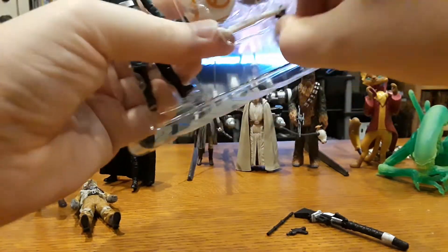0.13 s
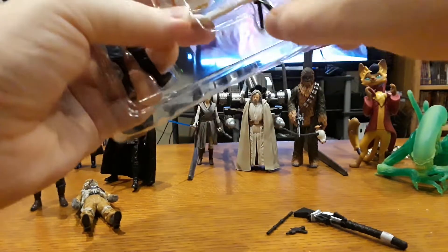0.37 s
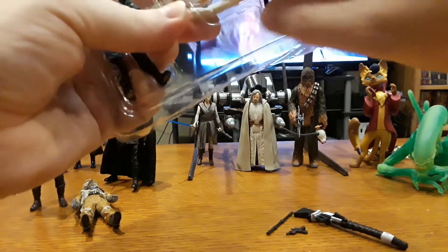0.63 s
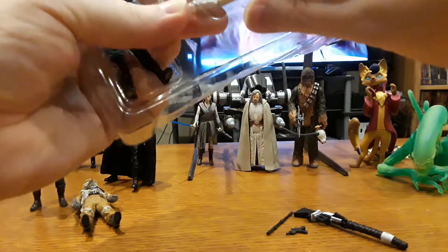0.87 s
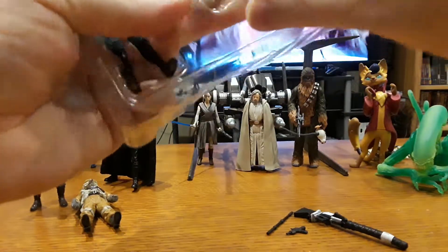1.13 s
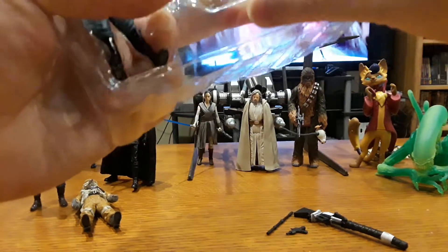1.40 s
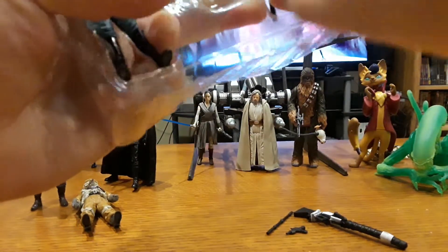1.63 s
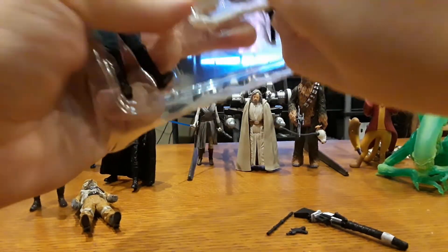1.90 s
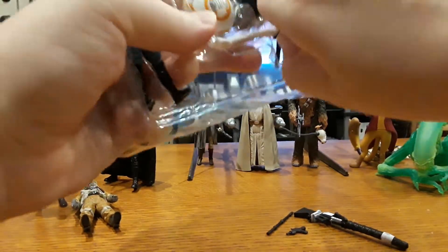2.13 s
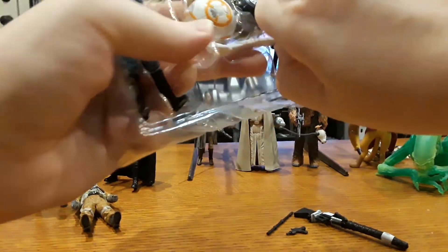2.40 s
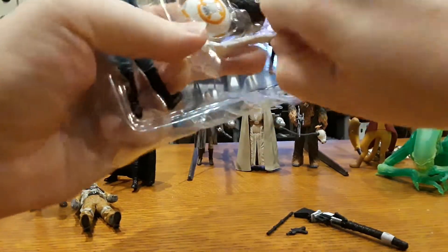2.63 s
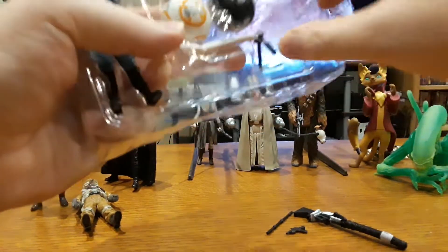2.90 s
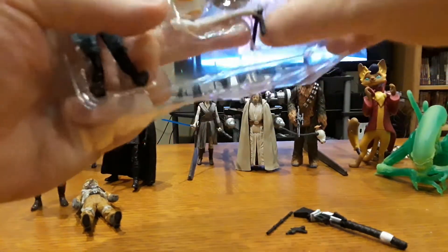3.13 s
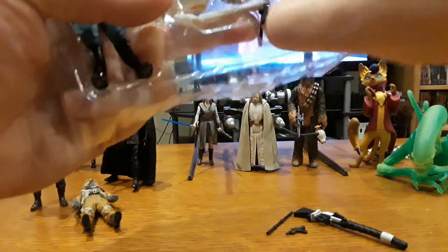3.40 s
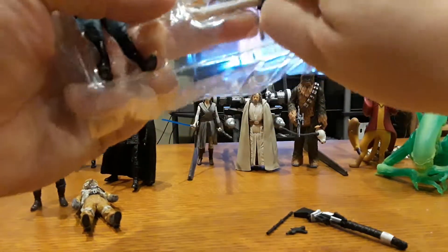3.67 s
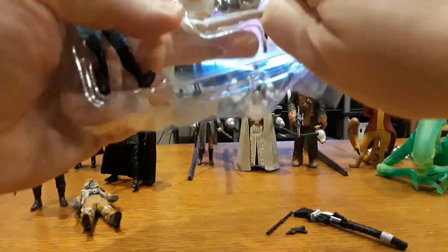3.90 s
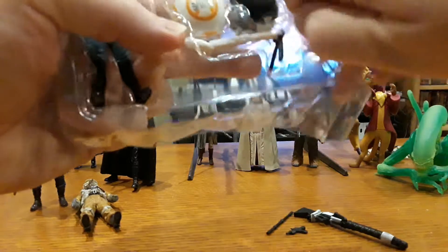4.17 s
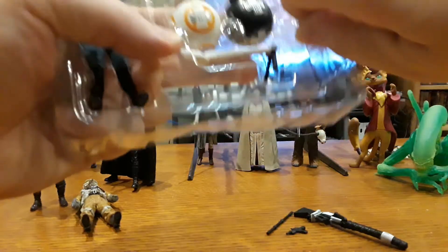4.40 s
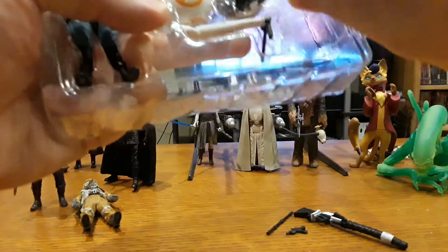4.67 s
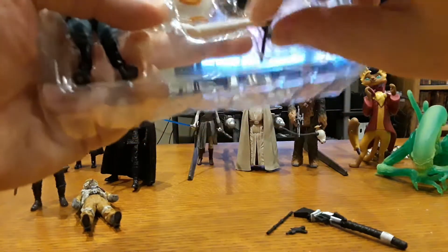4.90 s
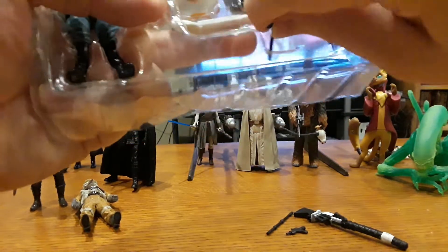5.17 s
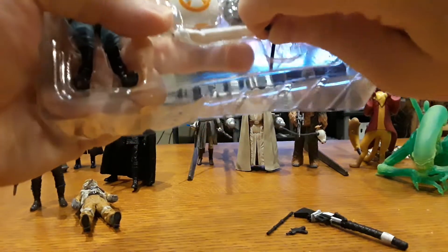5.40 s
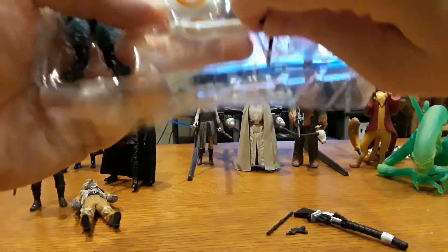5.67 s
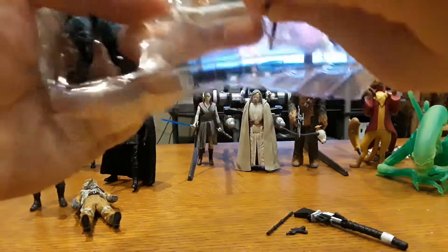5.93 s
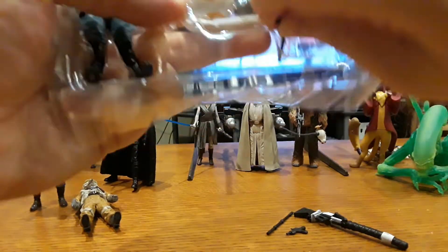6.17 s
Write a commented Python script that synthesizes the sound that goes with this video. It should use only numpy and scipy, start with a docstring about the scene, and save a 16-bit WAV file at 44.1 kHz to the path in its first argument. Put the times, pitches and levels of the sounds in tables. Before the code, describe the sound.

A stiff clear plastic tray is twisted by hand close to a stereo microphone in a small room, over faint hiss and low handling rumble. From 0 to 1.8 seconds, dry midrange clicks come irregularly amid fine crackle, short ticking slides and dull hollow pops, brighter around 1.1 and strong at 1.24. A hard snap with a puff of air, mostly left, lands at 1.9. From 2 to 3.7 it is lighter: small ticks, ratcheting runs and soft finger rub around 2.8 and 3.1 to 3.6, with one piercing tick near 3.2. Slides quicken from 3.8 into heavy cracks at 3.98 and 4.06, the loudest snap, filling the room with a short bright tail. After a click at 4.24 it thins to near quiet by 4.5. Faint ticking resumes around 4.8, clicks thicken from 5.4, and big buckling pops hit at 5.8, 5.9 and 6.05, with crackle to the end at about 6.3.

```python
"""Twisting a stiff plastic tray

Hands twist a stiff clear plastic tray close to two microphones on a table in a small room.
Clicks, most of them buckling creases, are short noise bursts that ring the crease and the tray's hollows.
Edges slide in ticking runs; dull damped thumps lie under some clicks or are panels popping.
Filtered noise makes the rub of fingers and a low rumble of handling.
Two hard snaps puff air, mostly at the left microphone, and fill the room; a faint hiss lies below."""
import sys
import numpy as np
from scipy import signal
from scipy.fft import rfft, irfft
from scipy.io import wavfile
from scipy.ndimage import uniform_filter1d

SR = 44100
rng = np.random.default_rng(int(sys.argv[2]) if len(sys.argv) > 2 else 0)


def int16_out(signal):
    """Quantize to a 16-bit WAV file."""
    q = np.round(np.clip(np.atleast_2d(signal).T, -1, 1) * 32767)
    wavfile.write(sys.argv[1], SR, q.astype(np.int16))


def field_ratio(decibels):
    """Amplitude ratio for a level in dB (20 dB per decade); scalars and array-likes work."""
    return 10 ** (np.asarray(decibels, dtype=float) / 20)


N = 277609  # samples in the scene, about 6.3 s
LEN = 2048  # samples in one short sound
T = np.arange(LEN) / SR  # seconds
HZ = np.arange(LEN // 2 + 1) * SR / LEN + 1e-3  # just above zero, so we can divide by it


def ring(hz, width):
    """Complex response of a resonance, gain 1 at its centre; a narrow width (Hz) rings longer."""
    detune = (HZ / hz - hz / HZ) * hz / width
    return 1 / (1 + 1j * detune)


def peak(spectrum, db):
    """Turn spectra back into sound, each row scaled to its peak level."""
    x = irfft(spectrum, LEN)
    return x * field_ratio(db) / np.abs(x).max(axis=-1, keepdims=True)


# How far the left microphone hears the tray ahead of the right one, as the tray moves.
# Each row: time in seconds, lead in milliseconds.
LEAD = [(0, .19), (2.3, .23), (2.8, .09), (3.7, .25), (4.5, .06), (5.2, .26)]


def place(s, grains, pan_db, alike):
    """Lay two-version sounds on the timeline: the right side is later and only partly the same."""
    out = np.zeros((2, N + LEN))
    rights = alike * grains[0] + np.sqrt(1 - alike ** 2) * grains[1]
    lead_ms = np.interp(s, *np.transpose(LEAD))
    for t, lead, left, right, pan in zip(s, lead_ms, grains[0], rights, pan_db):
        i = max(int(t * SR), 0)
        j = i + int(lead * SR / 1000)
        out[0, i:i + LEN] += left * field_ratio(pan / 2)
        out[1, j:j + LEN - 16] += right[:-16] * field_ratio(-pan / 2)  # shortened to leave room for the lead
    return out[:, :N]


def bands(centres, size):
    """Unrelated stereo noise in third-octave bands; the bass is more alike left and right."""
    for hz in centres:
        mid, side = rng.standard_normal((2, size))
        sos = signal.butter(2, [hz / 1.14, hz * 1.14], "band", fs=SR, output="sos")
        share = min(hz / 1000, 1)
        stereo = mid + share * side * np.array([[1], [-1]])
        yield signal.sosfilt(sos, stereo) / np.sqrt(1 + share ** 2)


def unsteady(rate, spread_db):
    """Gain that wanders at random, smoothed between new values drawn rate times a second."""
    k = int(SR / rate)
    steps = np.repeat(rng.standard_normal(N // k + 1), k)
    return field_ratio(spread_db * uniform_filter1d(steps, k)[:N])


def gain_over_time(table):
    """Gain that moves in straight lines, in dB, between the (seconds, dB) rows of a table."""
    return field_ratio(np.interp(np.arange(N) / SR, *np.transpose(table)))


# The colour of the hiss. Each row: frequency in Hz, relative level in dB per Hz.
HISS = [(35, -42), (60, 13), (659, 30), (8400, 9), (9200, 24), (16500, 12)]


def hiss():
    """Steady floor of room and electronics: noise shaped in frequency."""
    level_db = -68  # rms over both sides
    f = np.arange(N // 2 + 1) * SR / N + 1
    hz, db = np.transpose(HISS)
    colour = field_ratio(np.interp(np.log(f), np.log(hz), db))
    x = irfft(rfft(rng.standard_normal((2, N))) * colour, N)
    return x * field_ratio(level_db) / x.std()


# Low rumble of handling, swelling most at the second snap.
# Each row: time in seconds, gain in dB on the low noise.
RUMBLE = [(0.04, -36), (0.13, -29), (0.45, -36), (0.66, -46.5), (1.2, -44.5), (2.2, -58.5), (3.41, -36),
          (3.95, -46), (4.09, -25.5), (4.158, -42), (4.6, -63), (5.2, -56.5), (6.2, -40.5)]


def rumble():
    """Low noise bands that rise and fall with the handling and waver together."""
    low_noise = sum(bands([66, 84.0, 101.4, 138.5, 180.6, 316], N))
    return gain_over_time(RUMBLE) * unsteady(25, 3.5) * low_noise


# Fingertips rubbing along the tray. Each row: time in seconds, gain in dB on the friction noise.
RUB = [(2.72, -54), (2.79, -36.5), (2.87, -65), (3.039, -58.5), (3.1, -42.5), (3.26, -39), (3.33, -50),
       (3.42, -39), (3.63, -47.5), (3.7, -70)]


def rub():
    """Soft friction noise in the tray's low and high colours, each wavering on its own."""
    colours = bands([650, 950, 2700, 3700, 7500], N)
    return gain_over_time(RUB) * sum(unsteady(30, 5.2) * colour for colour in colours)


# How the room dies away across the spectrum.
# Each row: frequency in Hz, time to fall by 60 dB in seconds, relative level in dB.
ROOM = [(192, 0.12, -3.5), (890, 0.35, 1), (2800, 0.49, 1.5), (4220, 0.64, -9), (8240, 0.4, -5),
        (8500, 0.55, -13.5), (15000, .3, -11)]


def room():
    """Dense early echoes and a decaying tail, each band at its own pace, after the trip to the walls and back."""
    t = np.arange(SR // 2) / SR
    hz, t60, db = np.transpose(ROOM)
    centres = 180 * 2 ** np.arange(0, 6.6, 1 / 3)
    t60 = np.interp(np.log(centres), np.log(hz), t60)
    db = np.interp(np.log(centres), np.log(hz), db)
    tail = sum(field_ratio(g - 60 * t / d) * band for d, g, band in zip(t60, db, bands(centres, len(t))))
    # extra early echoes, with a soft start
    tail = tail * (1 + 2.2 * np.exp(-t / 0.016)) * (1 - np.exp(-t / 0.0016))
    tail = np.pad(tail, ((0, 0), (int(0.01 * SR), 0)))  # 10 ms trip
    return tail / np.sqrt(np.sum(tail ** 2) / 2)


# The hard snaps. Each row: start in seconds, puff level in dB before its fades and panning,
# puff frequency in Hz, level in dB of the impulse sent into the room.
SNAPS = [(1.914, -7, 77.6, 3.5), (4.061, -9, 94, 16.5)]


def puffs():
    """One slow, quickly fading swing of air pressure, mostly at the left microphone."""
    s, db, hz, _ = np.transpose(SNAPS)
    swing = field_ratio(db)[:, None] * np.cos(2 * np.pi * hz[:, None] * T + 0.51)
    swing = swing * np.exp(-T / 0.0041) * (1 - np.exp(-T / 0.0002))
    return place(s, [swing, 0 * swing], np.full(len(s), 2.6), 0.4)


def echoes(crinkle, dull):
    """The room's answer to the tray; hard snaps radiate past the hands, so the walls get far more of them."""
    source = (field_ratio(-19.5) * crinkle + field_ratio(-22.5) * dull).sum(axis=0)
    for t, _, _, room_db in SNAPS:
        source[int(t * SR)] += field_ratio(room_db)
    return signal.fftconvolve(source[None], room(), axes=1)[:, :N]


# Dull low thumps: panels popping, and the low body of some clicks.
# Each row: start in seconds, peak level in dB before panning, ring in Hz.
THUMPS = [(0.103, -26.5, 720), (0.129, -36, 113), (0.173, -32.5, 107), (0.196, -31, 198),
          (0.308, -23.5, 1160), (0.362, -17, 1100), (0.406, -25, 730), (0.481, -20.5, 870),
          (0.511, -34, 840), (0.536, -27, 1320), (0.633, -27, 1300), (0.77, -31, 730), (1.149, -19, 720),
          (1.238, -14, 640), (1.464, -25, 800), (1.708, -32, 940), (2.055, -25.5, 1130), (2.147, -24, 1360),
          (2.27, -37, 910), (2.361, -31.5, 1080), (2.393, -32, 800), (2.607, -24, 1110), (2.72, -29, 634),
          (2.767, -33.5, 280), (2.784, -28, 251), (3.066, -37.5, 287), (3.087, -27, 219),
          (3.104, -31.5, 218), (3.383, -35.5, 296), (3.406, -28, 212), (3.418, -26, 253), (3.443, -27, 256),
          (3.839, -14.5, 880), (3.93, -25, 870), (3.978, -8.5, 800), (4.075, -5, 883), (4.242, -34, 360),
          (4.331, -31.5, 870), (4.729, -41, 830), (4.737, -41, 660), (4.781, -47, 312), (4.843, -31, 480),
          (4.856, -32.5, 1100), (5.084, -32, 1340), (5.299, -27.5, 1320), (5.351, -28.5, 1400),
          (5.451, -22, 1090), (5.6, -26, 1010), (5.739, -28, 1050), (5.789, -12, 780), (5.793, -15, 780),
          (6.048, -9.5, 1010), (6.088, -21, 368), (6.113, -11.5, 729)]


def thumps():
    """A short push and a rough scrape with it drive one damped low mode and its broad overtones."""
    s, db, hz = np.transpose(THUMPS)[:, :, None]
    scrape = 0.26 * rng.standard_normal((len(s), LEN)) * np.exp(-T * hz / 4.96)
    push = T * hz / 0.18 * np.exp(1 - T * hz / 0.051)
    mode = ring(hz, 0.099 * hz + 30)
    overtones = 0.5 * ring(1.41 * hz, 2.0 * hz)
    body = peak(rfft(push + scrape) * (mode + overtones) * ring(hz, 1.72 * hz), db)
    return place(s[:, 0], [body, 0 * body], np.full(len(s), 1.5), 1.0)


ALIKE = 0.45  # likeness of a click left and right, 1 = the same

# Tiny high ticks of the thinnest creases.
# Each row: start in seconds, peak level in dB before a shared lift and panning, ring in Hz.
TICKS = [(1.068, -31, 11500), (1.788, -27, 8500), (1.861, -28, 12000), (2.529, -26, 8600),
         (3.177, -22, 13400), (3.194, -28, 11200), (3.2008, -31, 10900), (3.2252, -10.5, 10400),
         (3.258, -35, 7500), (3.4356, -29, 7710), (3.667, -27.5, 7100), (4.8897, -36, 7400),
         (5.147, -33, 13800), (5.171, -27, 11500), (5.215, -17.5, 13400), (5.3475, -29, 12900),
         (5.374, -28.5, 6160), (5.5062, -28.5, 8100)]


def ticks():
    """A near-instant crack that rings high for a few cycles."""
    s, db, hz = np.transpose(TICKS)[:, :, None]
    lift_db = 7.5
    noise = rng.standard_normal((2, len(s), LEN))
    crack = noise * T * (np.exp(-T / 0.00012) + 0.004 * np.exp(-T / 0.0012))
    grains = peak(rfft(crack) * ring(hz, 0.33 * hz) ** 2, db + lift_db)
    return place(s[:, 0], grains, np.full(len(s), 1.1), ALIKE)


# Hands at work. Each row: time in seconds, middle level in dB of the fine crackle,
# middle level in dB of a crease's bright edge against its ring.
WORK = [(0.0, -32.5, -7), (0.4, -35, -9), (0.7, -39, -11), (1.06, -34.5, -10), (1.11, -26, 3),
        (1.41, -38.5, -18), (1.81, -43.5, -2), (2.3, -47, -12.5), (2.75, -39, -5.5), (2.9, -47, -24),
        (3.45, -37, -2.5), (3.75, -43, -3), (3.82, -31, -32), (4.1, -21.5, -18), (4.5, -66.5, -15),
        (4.841, -46.5, -6.5), (5.002, -57, -10), (5.09, -46, -8), (5.4, -40, -10), (5.6, -42.5, -3),
        (5.79, -25, -13), (6.29, -31, -8)]


def crackle(s, db, spread_db, low_hz, high_hz, body_db, edge_db=0):
    """Small creases of random size and colour, as bright as the hands make them."""
    t, _, bright_db = np.transpose(WORK)
    size, colour, shine = rng.random((3, len(s)))
    bright_db = np.interp(s, t, bright_db) + edge_db + 10 * (shine - 0.5)
    hz = low_hz * (high_hz / low_hz) ** colour
    return clicks(s, db + spread_db * (size - 0.5), hz, bright_db, body_db)


def rustle():
    """A dense bed of tiny creases at random moments, as loud as the hands work."""
    s = rng.uniform(0, (N - 1) / SR, size=850)
    t, db, _ = np.transpose(WORK)
    return crackle(s, np.interp(s, t, db), spread_db=15.5, low_hz=800, high_hz=3920, body_db=10.5)


# Plastic sliding over plastic in runs of stick-slip steps. Each row: first step in seconds,
# last step in seconds, gap between steps in seconds, middle peak level of a step's ring in dB.
SLIDES = [(.095, .114, .0095, -27), (.324, .353, .0145, -26), (.437, .459, .011, -29),
          (.588, .605, .017, -26), (.830, .851, .0105, -29), (.910, .946, .012, -33),
          (1.101, 1.161, .012, -24), (1.313, 1.326, .013, -23), (1.487, 1.547, .015, -27),
          (2.015, 2.042, .009, -25), (2.067, 2.127, .0102, -28), (2.337, 2.376, .0097, -34),
          (2.425, 2.435, .01, -33), (2.468, 2.498, .01, -29), (2.518, 2.552, .0085, -30),
          (2.669, 2.694, .0125, -34), (2.85, 2.902, .052, -32), (3.28, 3.304, .012, -28),
          (3.362, 3.403, .0137, -27), (3.459, 3.487, .014, -27), (3.519, 3.64, .0202, -28),
          (3.784, 3.81, .0087, -22), (3.85, 3.892, .0084, -19), (3.909, 3.935, .013, -18),
          (3.951, 3.966, .0075, -20), (4.022, 4.055, .0165, -18), (4.285, 4.317, .011, -31),
          (4.477, 4.524, .012, -35), (4.785, 4.916, .0145, -40), (4.965, 5.011, .0115, -38),
          (5.054, 5.148, .0117, -38), (5.18, 5.211, .008, -36), (5.297, 5.308, .0055, -32),
          (5.316, 5.341, .0083, -25), (5.383, 5.394, .011, -23), (5.612, 5.624, .012, -30),
          (5.8, 5.812, .012, -19), (5.858, 5.893, .0175, -24), (5.953, 5.977, .024, -17),
          (5.994, 6.022, .028, -16), (6.144, 6.189, .009, -23)]


def ratchet():
    """Each slide sticks and slips at its own pace, a little unevenly after the first step."""
    first, last, gap, db = np.transpose(SLIDES)[:, :, None]
    scatter = 0.08  # typical share of the gap by which a step comes early or late
    k = np.arange(12)
    uneven = scatter * (k > 0) * rng.standard_normal((len(SLIDES), len(k)))
    s = first + gap * (k + uneven)
    on = k < (last - first) / gap + 0.5  # only the steps up to the last one
    return crackle(s[on], (db + 0 * k)[on], spread_db=4, low_hz=3400, high_hz=4300, body_db=-6, edge_db=4)


# The tray's hollows. Each row: middle frequency in Hz, relative gain in dB before random variation,
# time to fall by 60 dB in seconds.
HOLLOWS = [(767.4, 5, 0.043), (870, -17, 0.017), (427, -6, 0.052), (1165, 1, 0.024), (2160, 3, 0.079)]


def clicks(s, db, hz, bright_db, body_db=0):
    """A millisecond of tearing noise rings a crease and a bright edge; a sharp jolt rings the tray's hollows."""
    db, hz, bright_db = (np.asarray(v)[:, None] for v in (db, hz, bright_db))
    noise = rng.standard_normal((2, len(s), LEN))
    pan_db = 1.55 + 2.26 * rng.standard_normal(len(s))  # each crease sits somewhere else on the tray
    rise = (1 - np.exp(-T / 0.0004)) ** 2

    tear = noise * rise * (np.exp(-T / 0.0009) + field_ratio(body_db) * 0.09 * np.exp(-T / 0.0058))
    blunt = ring(hz, 0.45 * hz) ** 2 + 0.26 * ring(hz, 1.5 * hz)
    broad = field_ratio(body_db) * 0.2 * ring(2260, 4250) ** 2
    crease = peak(rfft(tear) * (blunt + broad), db)

    # the treble is over sooner
    snap = noise * rise * (np.exp(-T / 0.0007) + field_ratio(body_db) * 0.025 * np.exp(-T / 0.005))
    edge = peak(rfft(snap) * (ring(7220, 2000) + 0.51 * ring(11080, 3400) ** 2), db + bright_db)

    # every bend shifts the hollows a little and excites them unevenly
    modes = 0.0062 * ring(696, 640)
    for f, gain_db, t60 in HOLLOWS:
        uneven, shift = rng.standard_normal((2, len(s), 1))
        width = np.log(1000) / np.pi / t60
        modes = modes + field_ratio(gain_db + 5.5 * uneven) * ring(f * (1 + 0.108 * shift), width) * t60
    jolt = np.exp(-T / 0.00017)
    hollow = peak(rfft(jolt) * modes, db + body_db - 19)
    return place(s, crease + edge, pan_db, ALIKE) + place(s, [hollow, 0 * hollow], pan_db, 1)


# Clicks that stand out singly, loud and faint, with the snaps' cracks and an early echo among them.
# Each row: start in seconds, peak level of the ring in dB before panning, ring in Hz,
# peak of the bright edge in dB against the ring.
CLICKS = [(0.0054, -22, 3200, -30), (0.073, -15.5, 3420, -8), (0.1942, -18, 3600, -10),
          (0.2279, -14, 2800, -21), (0.298, -24.5, 4270, -18), (0.3606, -14, 2440, -20),
          (0.39, -29, 3600, -13), (0.399, -19.5, 2570, -14), (0.4815, -17.5, 2590, -35),
          (0.521, -20.5, 2530, -18), (0.572, -12.5, 2500, -26), (0.5966, -18.5, 2020, -5),
          (0.6802, -25.5, 3500, -37), (0.7687, -16, 3000, -2), (0.7969, -20, 2300, -31),
          (0.9561, -13, 6800, -5.5), (1.0498, -25, 2850, -23), (1.087, -15.5, 6630, 7),
          (1.1168, -20, 5160, 4), (1.188, -28, 2740, -2), (1.1976, -21, 2770, -20), (1.213, -17.5, 3950, 0),
          (1.238, -8.5, 2400, -5.5), (1.3317, -14.5, 2350, -35), (1.358, -21.5, 3420, -34),
          (1.435, -25.5, 3700, 1), (1.4654, -12.5, 2260, -32), (1.5555, -18.5, 3400, -19),
          (1.563, -26.5, 3800, 7.5), (1.6006, -15.5, 3470, -25), (1.6518, -27, 3440, -7),
          (1.6982, -25, 3440, 5), (1.738, -28.5, 2780, -16), (1.885, -21, 3070, 4), (1.9143, -9.5, 1520, 3),
          (1.926, -12.5, 3400, -3), (2.0568, -21.5, 2900, -20), (2.1492, -29.5, 2520, -26),
          (2.161, -30.5, 3400, -1), (2.193, -21.5, 2780, -14), (2.208, -25.5, 3570, -1),
          (2.2139, -23, 3580, -3), (2.283, -40, 4230, 14.5), (2.3926, -26.5, 3230, 4),
          (2.586, -28.5, 3820, 2), (2.6003, -27.5, 3250, -14), (2.7475, -22.5, 3600, -3),
          (2.9524, -22, 3650, -6.5), (3.051, -21.5, 8700, -23), (3.0919, -18.5, 3440, -20),
          (3.116, -28.5, 3400, -5), (3.18, -24, 3320, -11), (3.2115, -18.5, 3350, -10),
          (3.349, -27.5, 3560, 0), (3.5399, -26, 3240, -8), (3.582, -21, 3280, -6), (3.774, -21, 3340, -7),
          (3.8169, -12, 2350, -30), (3.833, -34, 4200, -18), (3.84, -8.5, 3900, -17),
          (3.9783, -4.5, 1640, -8), (4.0609, -1.5, 2960, -15), (4.075, -7, 2800, -16),
          (4.2419, -7.5, 5700, -22), (4.368, -17, 6210, -13), (4.547, -41, 3860, 15),
          (4.62, -33, 4300, -27), (4.6882, -29.5, 3700, -19), (4.736, -31.5, 2700, -8),
          (4.811, -32.5, 2600, -6), (4.855, -27, 2800, -4), (5.216, -31, 3800, 2), (5.275, -31, 4250, 12.5),
          (5.28, -28, 3870, -2), (5.35, -23, 4040, -6), (5.375, -40, 3595, 16), (5.416, -19, 3120, -26),
          (5.439, -23, 3850, 2), (5.4553, -20.5, 4030, -11), (5.4804, -20, 3150, -14),
          (5.4977, -21, 4600, -20), (5.5201, -20, 3380, -10), (5.5509, -19, 3570, -7),
          (5.5937, -14.5, 4130, -9), (5.6, -20, 3120, -1), (5.6581, -15.5, 3730, -3),
          (5.6745, -27, 3500, 5), (5.6955, -22, 3660, 0), (5.711, -16.5, 1470, -31),
          (5.7609, -16.5, 5700, 4.5), (5.7826, -4, 1980, -25), (5.9087, -6.5, 3140, -11.5),
          (5.9303, -14, 3100, -4), (6.05, -2, 2130, -38), (6.114, -33, 3300, -7),
          (6.2154, -11.5, 2900, -28), (6.2257, -14, 3220, -32), (6.244, -8.5, 4000, -6),
          (6.252, -17, 3180, -3)]


def single_clicks():
    """Clicks that stand out singly, each with its own level, ring and brightness."""
    return clicks(*np.transpose(CLICKS))


def scene():
    """Tray, its room sound, puffs, finger rub, rumble and hiss."""
    crinkle = single_clicks() + ticks() + ratchet() + rustle()
    dull = thumps()
    tray = crinkle + dull + echoes(crinkle, dull)
    return tray + puffs() + rub() + rumble() + hiss()


def top_cut(x):
    """Nothing passes above the cut-off."""
    return signal.sosfilt(signal.butter(12, 16980, fs=SR, output="sos"), x)


def record(dry):
    """The microphones soften the treble a little and round off the loudest peaks."""
    dull = signal.lfilter(*signal.butter(1, 5500, fs=SR), dry)
    soft = 0.56 * dry + 0.61 * dull
    mix = np.tanh(1.181 * soft) / 1.057
    return top_cut(mix)


dry = scene()
out = record(dry)
int16_out(out)
```